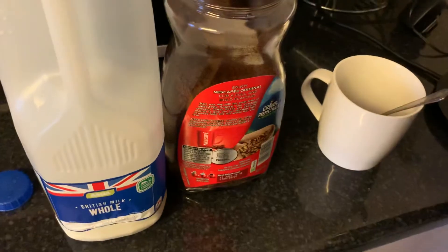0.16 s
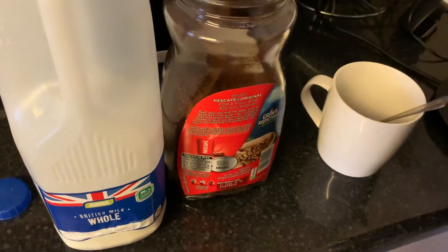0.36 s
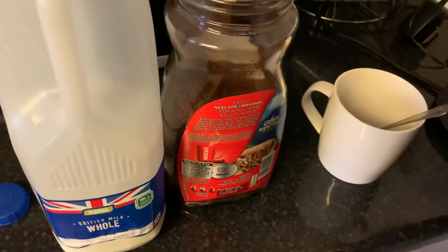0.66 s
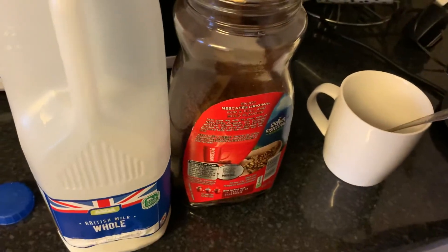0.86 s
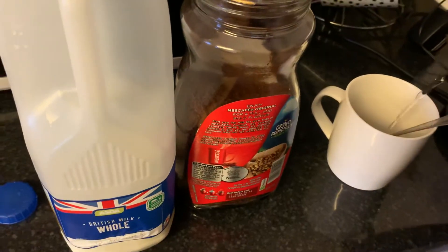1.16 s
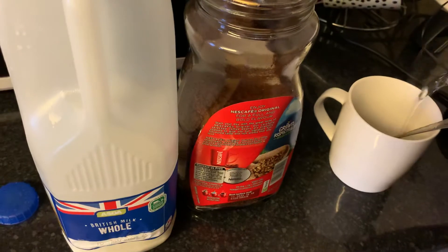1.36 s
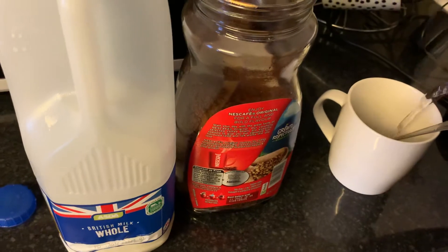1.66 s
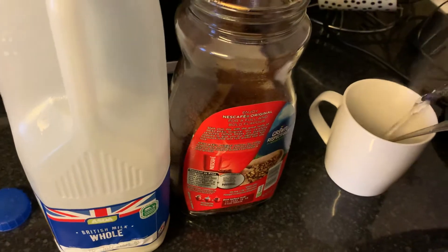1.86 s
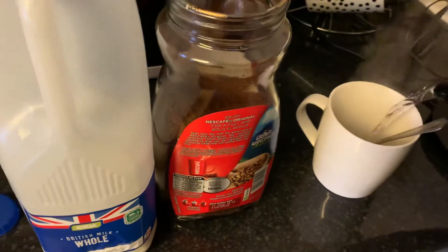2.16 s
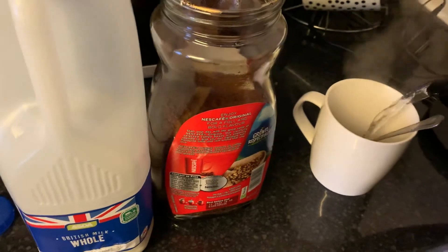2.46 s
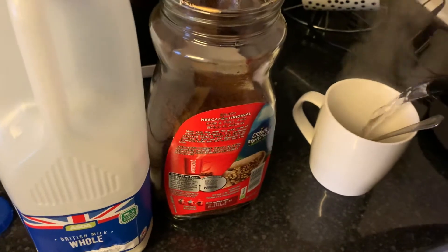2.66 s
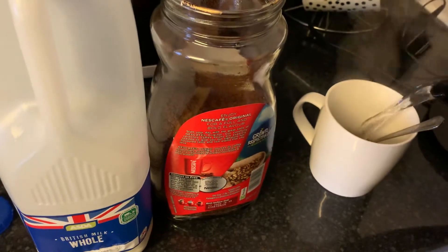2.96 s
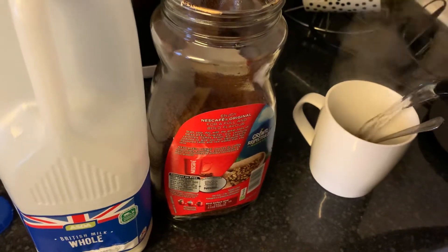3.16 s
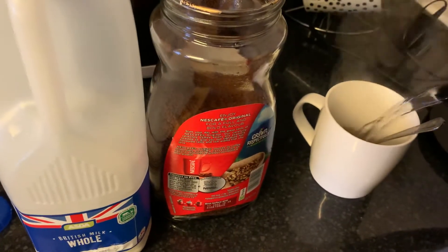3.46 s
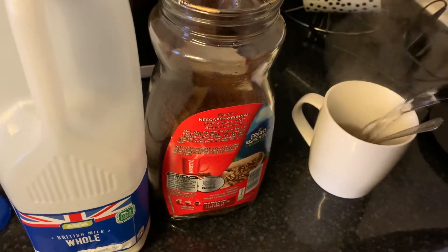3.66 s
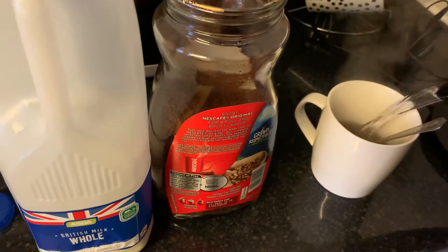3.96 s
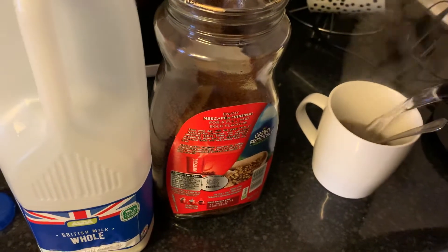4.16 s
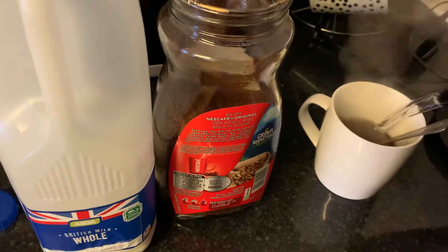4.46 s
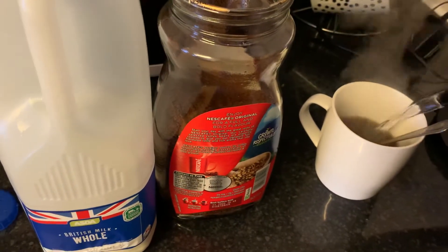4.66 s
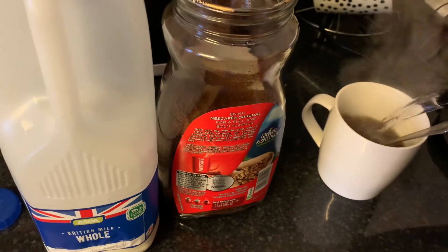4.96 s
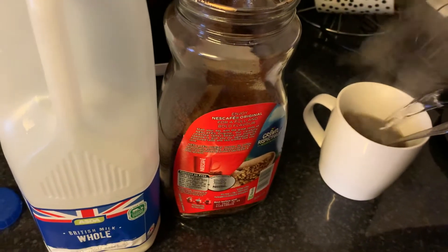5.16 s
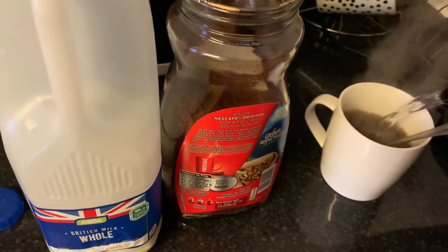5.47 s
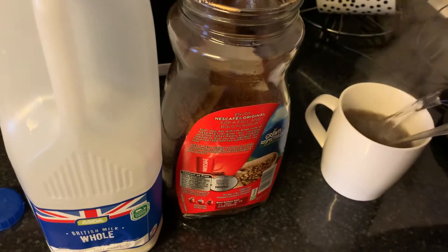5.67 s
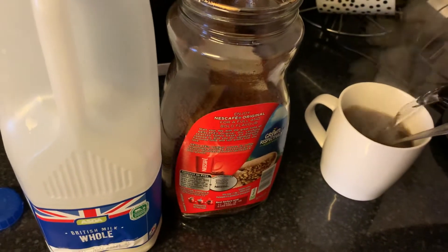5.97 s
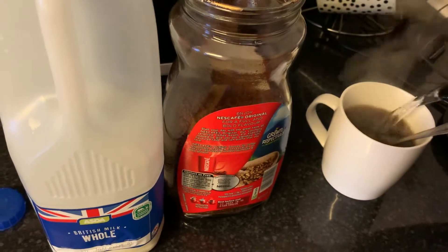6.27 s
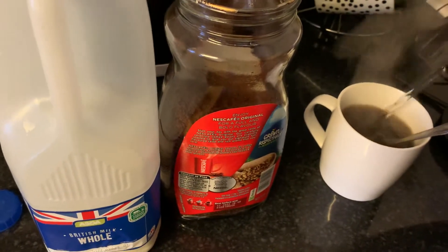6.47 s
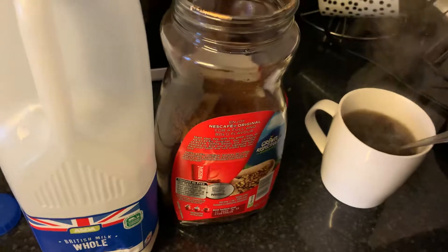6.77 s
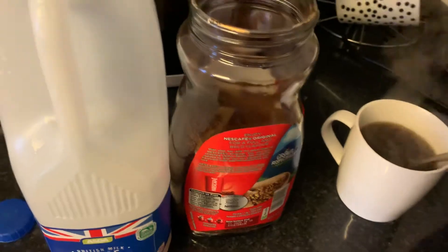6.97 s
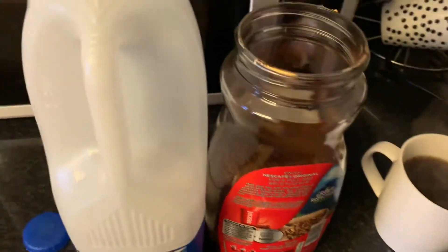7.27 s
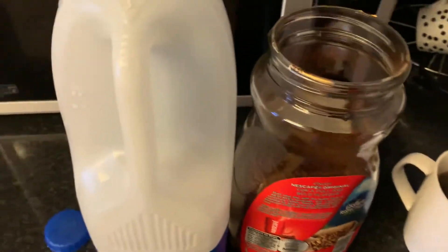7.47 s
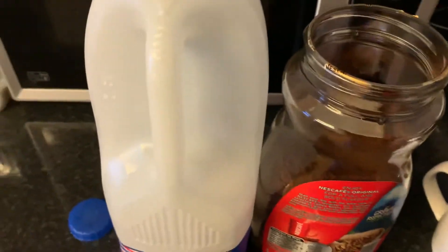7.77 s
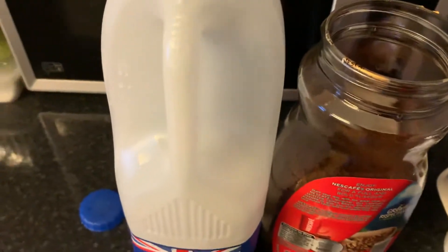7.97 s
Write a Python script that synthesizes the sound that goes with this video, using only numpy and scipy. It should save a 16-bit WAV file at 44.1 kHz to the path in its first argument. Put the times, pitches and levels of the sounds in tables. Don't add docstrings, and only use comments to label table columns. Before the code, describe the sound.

A still-hissing kettle pours a thin, gurgling stream into a mug in a small kitchen, followed by last drips and a few booming knocks.

```python
import sys
import numpy as np
from scipy import signal
from scipy.fft import rfft, irfft, next_fast_len
from scipy.io import wavfile

SR = 44100
rng = np.random.default_rng(int(sys.argv[2]) if len(sys.argv) > 2 else 0)


def elevation(decibels):
    levels = np.asarray(decibels, float)
    return 10 ** (levels / 20)


def unload_audio(sound):
    columns = np.transpose(np.atleast_2d(sound))
    steps = np.round(np.clip(columns, -1, 1) * 32767)
    wavfile.write(sys.argv[1], SR, steps.astype(np.int16))


N = 358091
SPRAY_START_S, SPRAY_END_S = 1.2, 9.3

# (time [s], flow [dB])
FLOW = [(0, -68.5), (1.1, -66.5), (1.23, -63), (1.33, -71), (1.8, -68), (2.3, -68.5), (3.0, -66.5),
        (3.9, -64), (3.97, -60), (4.2, -61.5), (4.26, -61), (4.52, -65), (4.68, -60.5), (4.85, -67.5),
        (5.7, -67), (6.25, -70), (6.5, -56.5), (6.64, -67.5)]
# (frequency [Hz], width [Hz], level [dB])
MUG = [(280, 26, -17), (343, 165, -6), (620, 20.4, -11.5), (834, 83, -15), (1480, 340, 6.5),
       (1800, 290, -13), (2280, 59, -4), (3240, 720, -20)]


def stream():
    t = np.arange(N) / SR
    flow_db = np.interp(t, *np.transpose(FLOW))
    column_hz = np.interp(t, (0.93, 3.85), (887, 1150))

    no_stream = (t < SPRAY_START_S) | (t > FLOW[-1][0])
    splash_db = flow_db + 1.5 * drift(3.4) - 30 * no_stream
    splashes = scatter(150., 4.)
    splash = evened(resonate(splashes, column_hz, 88.0))
    for hz, width, db in MUG[4:]:
        splash += elevation(db) * evened(resonate(splashes, hz, width))

    gurgle_db = -66 + 1.46 * (flow_db + 65.5) + 1.3 * drift(11.0)
    surges = scatter(300., 3.)
    gurgle = np.zeros(N)
    for hz, width, db in MUG[:4]:
        rocking = resonate(resonate(surges, hz, width), hz, 3 * width)
        gurgle += elevation(db) * evened(rocking)

    above = place(elevation(splash_db - 8.0) * splash, -0.35, lag=5)[:, :N]
    below = place(elevation(gurgle_db - 3.5) * evened(gurgle), 2.9, lag=0)
    return above + below


# (time [s], peak level [dB], frequency [Hz])
DROPS = [(1.702, -44.5, 1000), (1.883, -39, 865), (2.244, -30, 885), (2.321, -43, 990), (2.375, -43, 920),
         (2.399, -28.5, 946), (2.609, -43, 1040), (2.633, -40, 990), (2.78, -42, 1040), (2.94, -43, 1030),
         (2.966, -38, 983), (3.008, -40, 1020), (3.59, -42, 1095), (3.798, -46, 1087), (3.948, -41.5, 1110),
         (4.006, -42, 1070), (4.058, -40.5, 1080), (4.105, -42, 1050), (4.235, -47, 620),
         (4.294, -43, 1050), (4.387, -41, 1070), (4.64, -48, 583), (4.645, -45, 1080), (4.265, -46, 1150),
         (2.437, -51, 960)]
# (time [s], peak level [dB], frequency [Hz], T60 [s],
# left-right [dB])
PATTER = [
    (1.17, -58, 843, 0.092, -1),
    (1.24, -61, 845, 0.058, -5),
    (1.63, -55, 840, 0.085, 5),
    (2.94, -57, 880, 0.06, -3),
    (3.28, -70, 620, 0.044, 4),
    (4.7, -48, 620, 0.045, 4),
    (4.696, -46, 1070, 0.061, -6),
    (5.26, -55, 620, 0.1, 11),
]


def drops():
    rows = by_pitch(DROPS, 42.5, -1.9, -7.0) + by_pitch(spray(count=18), 120., 2.2, .1) + PATTER
    return rings(rows, partner=1.155, partner_db=-4.5, glide=0.95, rise_s=0.0015, wall_db=-30, lag=6)


# (time [s], peak level [dB], frequency [Hz])
SLAPS = [(1.746, -40.5, 1650), (1.905, -51, 1300), (1.955, -45.5, 2100), (2.124, -46, 2300),
         (3.272, -35, 1700), (3.77, -43, 1500), (4.684, -45, 1480), (4.744, -44, 1480),
         (4.816, -48.5, 1470), (4.929, -45.5, 1480), (4.97, -48.5, 1520), (5.172, -43, 1520),
         (5.254, -41, 1465), (5.513, -47.5, 1480)]


def slaps():
    rows = by_pitch(SLAPS, 45.0, .6, 2.6)
    return rings(rows, partner=1.25, partner_db=-2.8, glide=-0.39, rise_s=0.0004, wall_db=-6.5, lag=4)


# (time [s], peak level [dB], frequency [Hz], T60 [s], left-right [dB])
DRIPS = [
    (6.432, -47, 2030, .02, 2),
    (6.4562, -37, 1500, .016, 1),
    (6.4792, -30, 1470, .02, 0),
    (6.5008, -26.5, 1490, .02, -1),
    (6.5275, -31, 1450, .014, 0),
    (6.529, -36, 1090, .035, 0),
]


def drips():
    return rings(DRIPS, partner=1.42, partner_db=-4, glide=-2.0, rise_s=0.00045, wall_db=-10, lag=2)


# (time [s], peak level [dB], frequency [Hz])
GULPS = [(0.228, -63, 283), (0.398, -63, 250), (1.183, -59, 280), (1.366, -59, 250), (1.654, -57, 254),
         (1.767, -51, 369), (1.833, -54.5, 286), (3.279, -61, 380), (3.96, -52, 365), (4.111, -56, 392),
         (4.174, -67, 320), (4.238, -54, 280), (4.578, -57, 280), (5.262, -58, 395), (5.498, -57, 264),
         (6.09, -50, 374), (6.343, -56, 288), (6.479, -54, 272), (6.534, -49, 384), (7.254, -64, 272),
         (7.669, -44, 405)]


def gulps():
    rows = by_pitch(GULPS, 29.0, 2.4, -19.0)
    return rings(rows, partner=0.57, partner_db=-5, glide=0.45, rise_s=0.0021, wall_db=-6, lag=0)


# (time [s], peak level [dB], frequency [Hz], T60 [s], left-right [dB])
GLUG = [
    (4.568, -46, 290, 0.3, 13),
    (4.575, -47.5, 202.6, 0.32, 9),
    (4.61, -45, 295, 0.21, 2),
]


def glug():
    return rings(GLUG, partner=1.75, partner_db=-11, glide=0.09, rise_s=0.021, wall_db=-60, lag=0)


# (time [s], peak level [dB], frequency [Hz], T60 [s], left-right [dB])
SPOON = [
    (2.247, -43.5, 6410, 0.1, 16),
    (2.256, -35.5, 2500, 0.029, 1),
]


def spoon():
    return rings(SPOON, partner=0.82, partner_db=-16, glide=.01, rise_s=.003, wall_db=-60, lag=3)


# (time [s], contact [s], strength [dB], spot [0 base to 2 rim], left-right [dB])
BLOWS = [(6.323, 0.011, -31.5, 1.3, 1), (6.337, 0.0071, -32, 1.2, -3), (6.35, 0.029, -48.5, 0.34, 3),
         (7.838, 0.0091, -12, 1.22, -1), (7.844, 0.0031, -14.5, 0.022, -7), (7.86, 0.0079, -31, 0.32, 14),
         (7.871, 0.022, -29, 2.6, 6.5), (7.89, 0.096, -37.5, 0.47, 3), (8.054, 0.014, -35, 1.3, 11),
         (8.062, 0.01, -19.5, 0.92, -6.5), (8.072, 0.0061, -23.5, 1, 8), (8.082, 0.0063, -31.5, 1.6, -24),
         (8.099, .0081, -29, 2, 8), (8.109, 0.0077, -22, 0.49, 1)]
# (frequency [Hz], level [dB], T60 [s])
BODY = [
    [(274, 2, 0.039), (336, 6, 0.025), (440, 2, 0.023), (540, -2.5, 0.026), (654, -4, 0.013)],
    [(780, -0.5, 0.024), (847, 6.5, 0.026), (1010, -1, 0.027), (1300, -2, 0.013)],
    [(1590, 10, 0.015), (1850, 30, 0.004), (2090, 12.5, 0.014), (2650, 7.5, 0.017), (3130, 4.5, 0.007),
     (3540, -13, 0.005), (4800, -8, .007), (5900, 4, 0.006)],
]


def blows():
    out, t = np.zeros((2, N)), np.arange(4000) / SR
    crack = signal.lfilter(*signal.butter(2, (2280, 4960), "bandpass", fs=SR), t == 0)
    for s, contact_s, blow_db, spot, pan_db in BLOWS:
        sets = []
        for modes in BODY:
            shift = rng.uniform(-1, 1, 8)
            ring = np.zeros(len(t))
            for k, (hz, db, t60) in enumerate(modes):
                shifted_hz = hz * (1 + .035 * shift[k])
                decay = elevation(db + 2. * shift[-k - 1] - 60 * t / t60)
                ring += (-1) ** k * decay * np.sin(2 * np.pi * shifted_hz * t)
            sets.append(ring)
        sets.append(crack)

        sets_db = blow_db - 7 * abs(np.arange(len(sets)) - spot) + np.r_[0, 0, 0, -3.5]
        count = int(contact_s * SR)
        blow = 0
        for db, ring in zip(sets_db, sets):
            noise = rng.standard_normal(count)
            chatter = noise * abs(noise) * signal.windows.tukey(count, .4)
            rung = np.convolve(chatter, ring)
            blow = blow + elevation(db) * rung / abs(rung).max()
        add(out, s, place(blow, pan_db, lag=11))
    bass_cut = signal.butter(4, 270, "highpass", fs=SR, output="sos")
    return signal.sosfilt(bass_cut, out)


# (time [s], peak level [dB], frequency [Hz], T60 [s], left-right [dB])
THUDS = [
    (6.345, -40.5, 96, 0.29, 2.5),
    (6.392, -40, 47.8, 0.26, -1.5),
    (7.868, -25.5, 101, 0.15, -4),
    (7.846, -43, 175, 0.18, 7),
    (7.883, -23, 52, 0.38, -1.5),
    (8.084, -27.5, 93, 0.32, -4.5),
]


def thuds():
    boom = rings(THUDS, partner=1.9, partner_db=-14.5, glide=.01, rise_s=0.013, wall_db=-60, lag=0)
    return -signal.sosfilt(signal.butter(2, 34, "highpass", fs=SR, output="sos"), boom)


# (frequency [Hz], level [dB per Hz])
SIZZLE = [(5500, -18), (6500, -12), (7500, -2.5), (8200, -2), (9500, -0.5), (11800, -1.5), (12500, -3),
          (14000, -5), (15700, -9)]
# (time [s], peak level [dB], T60 [s])
SPITS = [
    (0.603, -59, 0.035),
    (0.7996, -46, 0.032),
    (0.85, -40, 0.049),
    (1.4393, -32.5, 0.014),
    (1.7554, -48, 0.035),
    (3.9479, -51, 0.03),
    (6.1325, -53, 0.035),
    (7.2469, -48, 0.035),
]
# (frequency [Hz], lead [rad])
SIZZLE_LEAD = [(6300, 0), (7400, 1.6), (8300, 3), (8900, 3.3), (10300, 5.9), (11700, 6.6), (12700, 9),
               (14100, 9.8), (15100, 12.2), (15800, 12.6)]


def sizzle(hz):
    t = np.arange(N) / SR
    level = elevation(0.69 * drift(7.6) + 0.45 * drift(90.))
    level += 0.31 * signal.lfilter([1], [1, -.99], abs(scatter(25., 3.3)))
    for s, db, t60 in SPITS:
        level += (t > s) * elevation(db + 47.0 - 60 * np.abs(t - s) / t60)
    lead = np.interp(hz, *np.transpose(SIZZLE_LEAD))
    return elevation(-48.5) * mic_pair(level, read(SIZZLE, hz), same=0.89, lead=lead, balance_db=0)


# (frequency [Hz], level [dB per Hz])
AIR = [(30, -37), (50, 3), (100, -5), (170, -10), (330, -12), (460, -20), (780, -15.5), (1000, -12.5),
       (1500, -7), (2100, -2), (3700, -2), (5500, -1.5), (7200, -2.5), (8500, -28)]
# (frequency [Hz], likeness [0-1], right leads [rad], left-right [dB])
MICS = [(0, 1, 1.5, -8), (138, 0.92, 0.5, 0.5), (397, 0.98, 2, 2), (497, 0.87, 2.5, 1.5),
        (1340, 0.24, 2, 4.5), (1920, 1, 2, 1), (2200, 0.74, -0.2, 6.5), (2340, 0.22, 1, 3.5),
        (3450, 0.46, -5, 0.5), (4300, 0.53, -4.5, 0.8), (5130, 0, -10, -1), (6580, 0.12, -13, -3.5),
        (8500, 0.2, -5.5, 0)]
# (frequency [Hz], width [Hz], level [dB])
COUNTER = [(255, 40, 7.5), (356, 26, -27.5), (508, 93, 16), (718, 20, 16.5), (1102, 157, 9.5),
           (2400, 65, 4.5), (3094, 60, 6), (3100, 83, -2.5), (3860, 100, 2.5), (4170, 63, 2),
           (5700, 100, -3)]


def air(hz):
    f, *columns = np.transpose(MICS)
    same, lead, balance_db = (np.interp(hz, f, column) for column in columns)
    colour_db = read(AIR, hz)
    for peak_hz, width, db in COUNTER:
        colour_db = colour_db + db * np.exp(-((hz - peak_hz) / width) ** 2)
    level = elevation(.5 * drift(2.5) + 0.68 * drift(28.0))
    return elevation(-50.5) * mic_pair(level, colour_db, same, lead, balance_db)


# (frequency [Hz], rms level [dB], starting phase [rad])
HUM = [
    (49.32, -75, .68),
    (98.7, -71, 4.19),
    (100.03, -72, 3.23),
]


def hum():
    t = np.arange(N) / SR
    out = np.zeros(N)
    for hz, db, start in HUM:
        out += np.sqrt(2) * elevation(db + 3.1 * drift(12.0)) * np.sin(2 * np.pi * hz * t + start)
    return out


def kitchen(x):
    length, t60 = SR // 2, 0.15
    slots = np.arange(100, length - 20, 20)
    at = slots + rng.integers(0, 20, (2, len(slots)))
    taps = np.zeros((2, length))
    np.put_along_axis(taps, at, rng.choice([-1., 1.], at.shape), 1)
    taps *= elevation(-60 * np.arange(length) / SR / t60)
    taps = signal.lfilter(*signal.butter(1, (273, 3080), "bandpass", fs=SR), taps)
    return signal.fftconvolve(x, taps / np.linalg.norm(taps[0]), axes=1)[:, :N]


def rings(rows, partner, partner_db, glide, rise_s, wall_db, lag):
    out = np.zeros((2, N))
    for s, db, hz, t60, pan_db in rows:
        t = np.arange(int(.12 * SR + t60 * SR)) / SR
        turns = 2 * np.pi * hz * (t + glide * t ** 2)
        tone = elevation(-60 * t / t60) * (np.sin(turns) + elevation(partner_db) * np.sin(partner * turns))
        slap_db = 51.0 * np.log2(np.clip(hz / 1500, .5, 1))
        wall = np.zeros(len(t))
        for mode_hz, width, mode_db in MUG:
            wall += elevation(mode_db) * np.exp(-np.pi * width * t) * np.sin(2 * np.pi * mode_hz * t)
        onset = 1 - np.exp(-t / rise_s)
        sound = elevation(db) * onset * (tone + elevation(wall_db + slap_db) * wall)
        add(out, s, place(sound, pan_db, lag))
    return out


def by_pitch(rows, turns, pan_db, pan_db_per_octave):
    middle = np.median(np.transpose(rows)[2])
    out = []
    for s, db, hz in rows:
        out.append((s, db, hz, turns / hz, pan_db + pan_db_per_octave * np.log2(hz / middle)))
    return out


def spray(count):
    low = np.array([SPRAY_START_S, -43, 2060])
    high = np.array([SPRAY_END_S, -81, 2570])
    return low + (high - low) * rng.random((count, 3))


def scatter(per_s, spread_db):
    size = elevation(spread_db * np.minimum(rng.exponential(1, N), 3))
    return size * (rng.random(N) < per_s / SR) * rng.choice([-1, 1], N)


def resonate(x, hz, width):
    turn = np.exp(2j * np.pi * np.cumsum(hz * np.ones(len(x))) / SR)
    r = np.exp(-np.pi * width / SR)
    return 2 * (turn * signal.lfilter([1 - r], [1, -r], x / turn)).real


def mic_pair(level, colour_db, same, lead, balance_db):
    size = next_fast_len(N)
    a, b = rfft(level * rng.standard_normal((2, N)), size)
    same = np.clip(same, 0, 1)
    left = a * elevation(balance_db / 2)
    right = (same * a * np.exp(1j * lead) + np.sqrt(1 - same ** 2) * b) * elevation(-balance_db / 2)
    return evened(irfft(np.array([left, right]) * elevation(colour_db), size)[:, :N])


def drift(hz):
    steps = rng.standard_normal(int(N / SR * 400) + 2)
    steps = evened(signal.lfilter([1], [1, -np.exp(-2 * np.pi * hz / 400)], steps))
    return np.interp(np.arange(N), np.linspace(0, N, len(steps)), steps)


def evened(x):
    return x / np.sqrt(np.mean(x ** 2) + 1e-20)


def read(points, hz):
    f, value = np.transpose(points)
    return np.interp(np.log(hz + 1), np.log(f + 1), value)


def place(x, pan_db, lag):
    left = elevation(pan_db / 2) * np.r_[np.zeros(lag), x]
    right = elevation(-pan_db / 2) * np.r_[x, np.zeros(lag)]
    return np.array([left, right])


def add(mix, s, sound):
    part = mix[:, round(s * SR):][:, :sound.shape[1]]
    part += sound[:, :part.shape[1]]


def scene():
    near = stream() + drops() + slaps() + drips() + gulps() + glug() + spoon() + blows()
    hz = np.fft.rfftfreq(next_fast_len(N), 1 / SR)
    steady = sizzle(hz) + air(hz) + hum()
    return near + elevation(-11) * kitchen(near) + thuds() + steady


def roll_off(x):
    return signal.sosfilt(signal.butter(12, 16960, fs=SR, output="sos"), x)


def record(dry):
    lowpass = signal.firwin(1023, 15760, window=("kaiser", 9), fs=SR)
    limited = signal.oaconvolve(dry, lowpass[None], "same")
    return roll_off(limited)


dry = scene()
out = record(dry)
unload_audio(out)
```